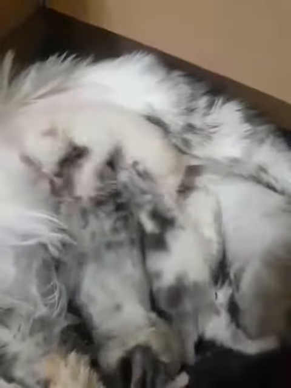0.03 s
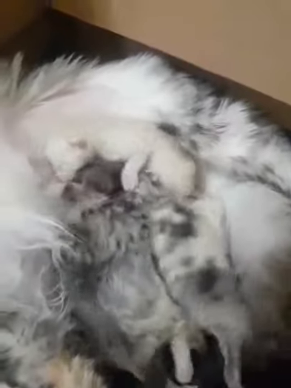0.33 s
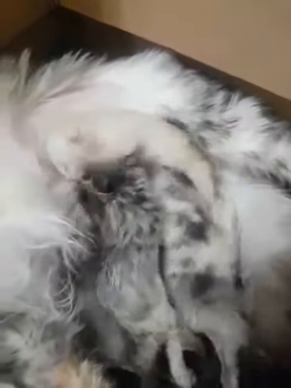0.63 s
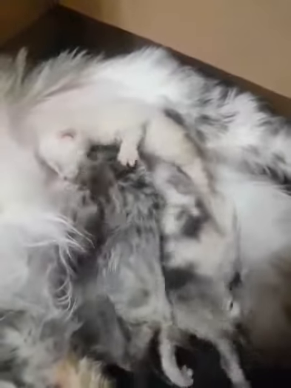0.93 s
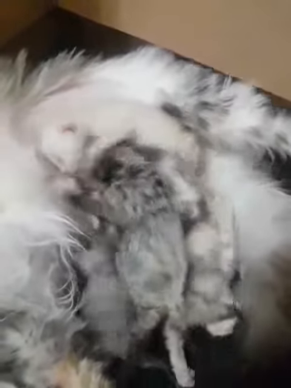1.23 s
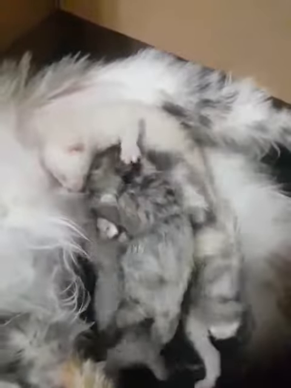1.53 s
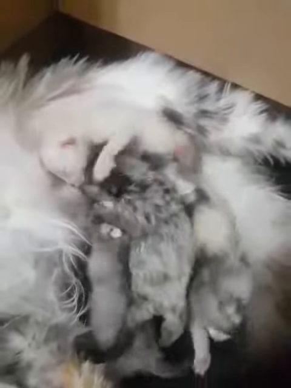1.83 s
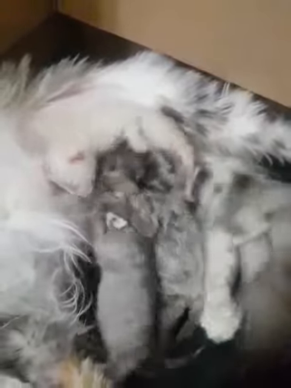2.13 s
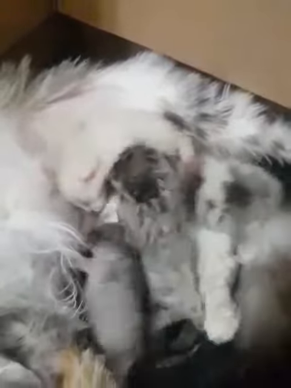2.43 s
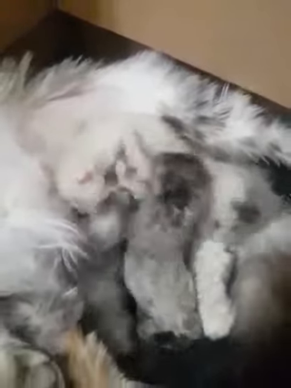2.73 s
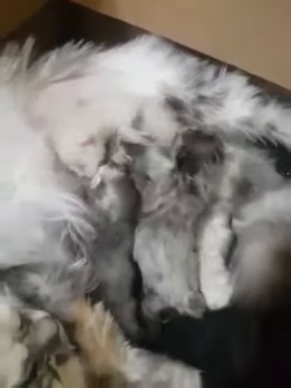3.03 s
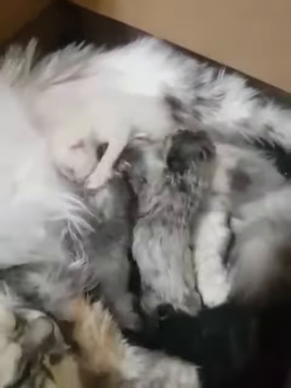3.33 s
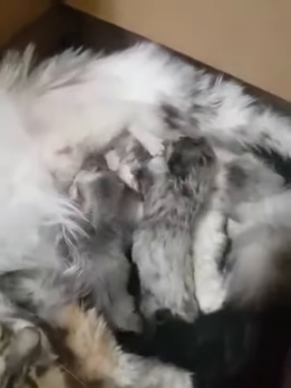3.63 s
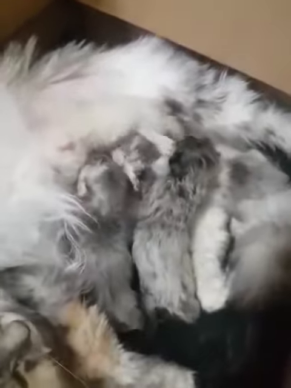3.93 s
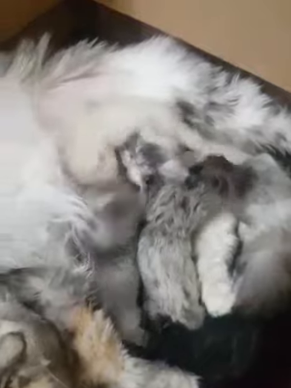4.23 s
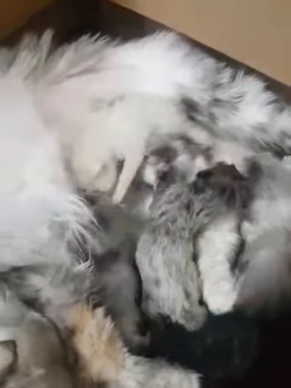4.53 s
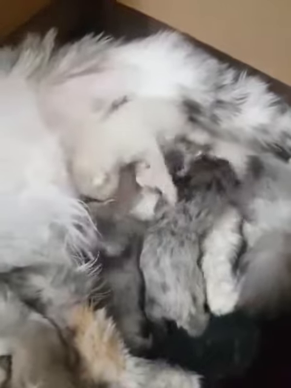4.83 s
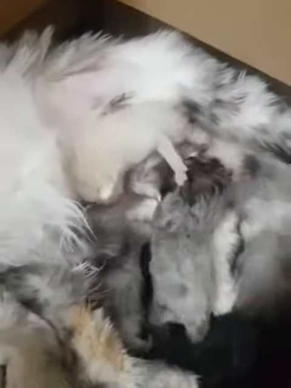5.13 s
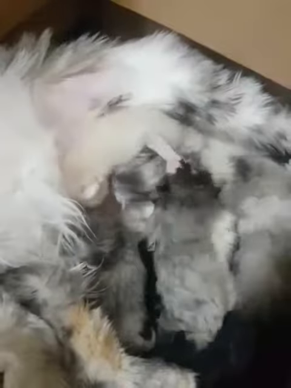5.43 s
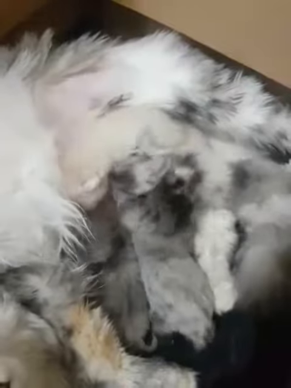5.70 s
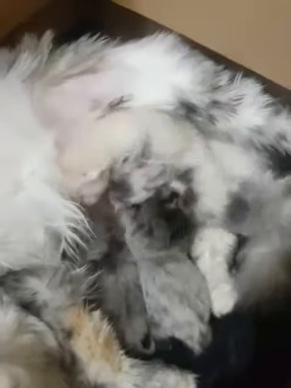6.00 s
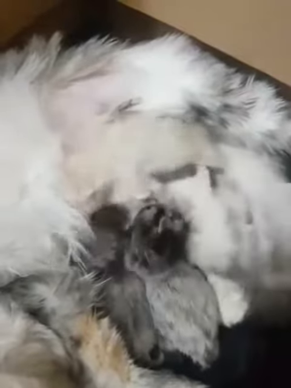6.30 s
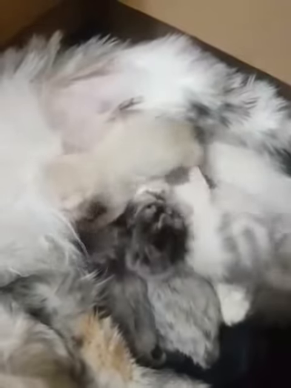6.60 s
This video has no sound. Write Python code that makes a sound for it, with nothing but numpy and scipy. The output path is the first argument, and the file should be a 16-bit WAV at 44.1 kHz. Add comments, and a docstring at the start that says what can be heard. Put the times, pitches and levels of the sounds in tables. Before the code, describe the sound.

Newborn kittens nurse in a cardboard box in a quiet room, heard close up with almost no echo. The mother's soft, low purr swells and eases throughout, over faint rumble and hiss. In the first second, fur rustles and paws tap lightly. From 1.1 to 1.7 seconds one kitten gives a high, thin cry, the loudest call, rising and then falling to a rough end. A small squeak follows at 2 seconds and a dull bump at 2.5. Faint, hoarse whimpers lead into another squeak at about 3.2 seconds, and a few taps come near 3.7. More breathy whimpers at 4.3 seconds run into a milder, fairly level mew from 4.6 to 5 seconds. After that only the purr, a faint rustle and tiny wet suckling clicks remain until the end, near 7 seconds. Everything sits slightly to the right.

```python
"""Newborn kittens nurse in a cardboard box in a quiet room. From the start fur rubs, paws tap,
small mouths click and the mother's voice box beats out a soft purr. After a second one kitten's
vocal folds buzz in a long cry that rises and falls. Short squeaks follow near 2 and 3 seconds,
with hoarse, breathy whimpers between the calls. A milder long mew ends at 5 seconds,
leaving the purr, a few faint clicks and a low rumble with hiss."""
import sys
import numpy as np
from scipy import signal
from scipy.fft import rfft, irfft, next_fast_len
from scipy.io import wavfile
from scipy.ndimage import map_coordinates

SR = 44100
rng = np.random.default_rng(int(sys.argv[2]) if len(sys.argv) > 2 else 0)


def wav_out(sig):
    """Save sig, one row per channel (or a flat mono array), as 16-bit PCM at SR to the path in sys.argv[1]."""
    wavfile.write(sys.argv[1], SR, np.round(np.clip(np.atleast_2d(sig).T, -1, 1) * 32767).astype(np.int16))


N = 298116

# The cry, two squeaks and the mild mew. Overtones and sharp top are set for an open mouth:
# level_db, swell_s, swell_db, mouth_opens_at_s, closing_share, overtones_db, sharp_db, hiss_ratio
CALLS = [(-42, 0.18, 17, 1.3505, 0.9, 16.5, -2.5, .4), (-53, 0.053, 7.5, 1.7, 0.6, 9.5, -27.5, 0.43),
         (-48.5, .07, 7.5, 3.09, 0, -6, -37.5, 0.45), (-46.5, 0.044, 7, 4.63, 0, -5, -15, 0.69)]
# How the pitch arches in each call (one list per squeak): time_s, pitch_hz
CRY_ARCH = [(1.13, 530), (1.151, 550), (1.18, 677), (1.215, 869), (1.291, 996), (1.324, 1009),
            (1.365, 1064), (1.43, 1075), (1.495, 1123), (1.53, 1115), (1.554, 1084), (1.59, 1044),
            (1.621, 940), (1.66, 883), (1.69, 764), (1.73, 485)]
SQUEAK_ARCHES = [
    [(1.928, 520), (1.95, 543), (1.975, 741), (2.0, 695.4), (2.025, 650), (2.046, 586)],
    [(3.12, 699), (3.135, 681), (3.205, 874), (3.24, 859), (3.281, 807)],
]
MEW_ARCH = [(4.576, 650), (4.6, 788), (4.625, 896), (4.66, 909), (4.7, 877), (4.75, 867), (4.78, 887),
            (4.82, 894), (4.86, 885), (4.9, 884), (4.93, 813), (4.955, 715), (4.97, 816), (4.984, 780)]
# How the mouth shapes the first three harmonics (multiples of the pitch): frequency_hz, gain_db
CRY_MOUTH = [(520, -1), (750, -1.5), (930, -2), (1080, 4.5), (1300, -0.5), (1520, 5), (1750, 5.5),
             (1880, -1.5), (2030, 12.5), (2170, 6), (2260, 8.5), (2600, 13.5), (2850, 10.5), (3300, -0.5)]
SQUEAK_MOUTH = [(550, 3.5), (850, -3), (1150, 4.5), (1400, 4), (1750, -2), (2100, 2), (2600, -9.5)]
MEW_MOUTH = [(700, -4), (890, -0.5), (1450, -0.5), (1780, -1), (2150, 0.5), (2450, 3), (2720, 1)]
# How the throat shapes the higher harmonics: frequency_hz, gain_db
CRY_THROAT = [(2600, 10), (3400, -10.5), (4350, 0.5), (4900, -10), (5600, -21.5), (6500, -26),
              (7500, -14.5), (8600, -34), (10000, -39.5), (11500, -34.5), (13000, -29)]
SQUEAK_THROAT = [(2600, 5.5), (3300, -7), (3900, 2.5), (4350, 3), (5000, -13), (5600, -31), (7500, -25),
                 (12500, -27)]
MEW_THROAT = [(2600, 16), (3500, 10.5), (4400, 7.5), (5300, -2.5), (6300, -2.5), (7300, -17), (8300, -24.5),
              (10000, -28.5), (12000, -17), (13200, -35.5)]
# The voice cracks for a moment: middle_s, half_length_s, roughness_share
VOICE_CRACKS = [(1.438, .014, 0.09), (1.582, 0.027, 0.12), (2.021, .03, 0.14), (3.141, 0.043, .25),
                (3.271, 0.029, 0.42), (4.587, .03, .3), (4.774, 0.057, 0.24), (4.974, 0.025, 0.3)]
# The voice catches, so the lowest harmonic jumps and the others dip: middle_s, jump_db
VOICE_CATCHES = [(1.719, 10.5), (2.038, 11.5), (3.274, 11.5), (4.795, 13.5), (4.968, 11)]
# Whimpers, alone or joined to a call: start_s, length_s, level_db, change_db, start_hz, end_hz
HOARSE_WHIMPERS = [(.1, .11, -59.5, 0.5, 702, 616), (1.125, .115, -65, 11, 539.4, 900),
                   (2.033, 0.036, -57, -8, 600, 566), (2.637, 0.077, -64, 2.5, 630, 524),
                   (2.794, .095, -58, -2.5, 751, 986), (2.881, 0.11, -60, -2.5, 985, 888),
                   (3.005, 0.12, -62, 0, 862.6, 715), (3.269, 0.039, -59.5, -0.5, 818, 782),
                   (4.275, .11, -54.5, -1, 545, 691), (4.36, .075, -57, -4.5, 688, 643),
                   (4.415, .15, -63, 6.5, 630, 807)]
# The tone colour of a hoarse voice: frequency_hz, gain_db
HOARSE_COLOUR = [(300, -37), (480, -1), (650, 2.5), (1200, 3), (2300, -1), (2650, -0.5), (3000, -37.5),
                 (3600, -14), (4400, 2), (5000, -16), (5600, -21.5), (8000, -27), (13000, -49)]
# How the voice arrives from two spots in the box: frequency_hz, left_minus_right_db, left_lead_radians
CRY_SPOT = [(650, -1.5, 0.29), (920, -17, 0.23), (1074, -9, 3.4), (1500, 0.5, 2), (2000, 3.5, 2),
            (2200, -5.5, 0.46), (3000, -8.5, 4.4), (3570, -8.5, 6.1), (4060, -10.5, 6.6),
            (4600, -11.5, 8.8), (5460, -6.5, 10.5), (7500, -14, 23), (9000, 7, 25.5), (12600, 0.5, 33.5)]
SMALL_CALL_SPOT = [(650, -1, -2), (900, -12.5, -0.96), (1350, -6.5, 3.5), (1760, -6.5, 1), (2690, -5.5, 2),
                   (3260, -6, 2.5), (4270, -6, 1.73), (5760, -3, -3), (12100, 5, 2)]
# The purr swells with the mother's slow breathing: middle_s, length_s, level_db
PURR_BREATHS = [(0.007, 0.18, -55.5), (0.595, 1, -61), (1.6, 1.2, -61), (2.777, 0.62, -57.5),
                (4.08, 0.77, -63), (5.027, 0.43, -59.5), (5.6, .3, -66), (6.566, 0.93, -62.5)]
# Where her chest rings: centre_hz, width_hz, gain_db
CHEST_RINGS = [(132.8, 104.2, 3), (189, 130, -2.5)]
# Fur rubs on fur and cardboard: middle_s, half_length_s, level_db
FUR_STROKES = [(.02, 0.024, -54), (.047, 0.057, -51.5), (.135, 0.14, -56), (0.177, .04, -56),
               (.246, 0.076, -51.5), (0.427, 0.15, -64), (.58, .14, -63.5), (0.834, 0.034, -58.5),
               (0.898, .08, -64.5), (1.39, 0.058, -49.5), (2.376, 0.038, -59.5), (2.84, 0.048, -59.5),
               (3.766, 0.035, -64.5), (4.052, 0.023, -62.5), (6.1, 0.064, -74)]
# The tone colour of rubbing fur: frequency_hz, gain_db
FUR_COLOUR = [(88, -35.5), (150, 0.5), (354, -4.5), (443, -8), (575, -2), (1070, -7), (2130, -11.5),
              (3330, -21.5), (4400, -18.5), (6050, -29), (13000, -39.5)]
# Dull taps and bumps, two strong low purr thumps and sharp wet clicks: start_s, peak_db, centre_hz
TAPS_AND_CLICKS = [(.036, -38, 900), (0.302, -56, 900), (0.5, -53, 705), (0.616, -47.5, 2500),
                   (.817, -39.5, 510), (.822, -41, 670), (1.315, -52.5, 7500), (1.43, -30.5, 701),
                   (1.5, -43, 496), (2.112, -47, 900), (2.144, -62, 1810), (2.177, -52.5, 900),
                   (2.36, -46.5, 755), (2.416, -57, 810), (2.51, -28, 327), (2.639, -48, 1000),
                   (2.793, -48, 198), (2.911, -43.5, 189), (3.056, -50, 980), (3.721, -43, 214),
                   (3.749, -47, 2000), (3.765, -39, 804), (3.896, -59, 2200), (5.589, -77, 900),
                   (6.04, -54, 1700)]
# How long the room's echo takes to fade by 60 dB: frequency_hz, fade_s
ECHO_FADES = [(200, 0.31), (2000, 0.38), (10000, 0.06)]
# The tone colour of the background rumble and hiss: frequency_hz, gain_db
BACKGROUND_COLOUR = [(20, -14), (35, -21.5), (55, -7), (100, -9.5), (230, -17.5), (440, -19.5),
                     (700, -21.5), (1100, -28.5), (2260, -23.5), (4400, -33), (7300, -37.5), (9000, -44),
                     (12200, -38), (13200, -42)]
# How alike that background is left and right (1 the same, -1 opposite): frequency_hz, likeness
BACKGROUND_LIKENESS = [(60, 0.86), (180, 0.4), (510, -0.37), (1510, -0.66), (4410, -0.38), (12900, -0.078)]

TOP_HZ = 13250  # upper limit of the sound
RELEASE_S, RELEASE_DB = 0.015, 11.5  # the quick drop that ends a call
SOFT_START_DB = -5.5  # harmonics two and three, until the call has swelled
SAG_DB_PER_OCTAVE, ROUGH_PER_OCTAVE = 6.5, 0.837  # a sinking pitch gets softer and rougher
CLEAN_OCTAVES, RATTLE_DB = 0.12, 13.5  # sag before the folds rattle; overtones gained at full rattle
OPEN_S = 0.036  # time to open the mouth
SHUT_THIRD_DB, SHUT_OVERTONES_DB, SHUT_SHARP_DB = -11, -9.5, -31.5  # a shut mouth dulls the voice
CATCH_HALF_S, CATCH_DIP = 0.01, 0.62  # the dip is in dB per dB of jump
FLUTTER_LOW_DB, FLUTTER_HIGH_DB = 0.47, 4.5  # unsteady level of the low and high harmonics


def mew(arch, call, mouth_colour, throat_colour):
    """Vocal folds buzz through throat and mouth; when they rattle, the tone frays into noise."""
    base_db, swell_s, swell_db, opens_s, closing, open_overtones_db, open_sharp_db, hiss_ratio = call
    t, window = span(arch)
    hz, = curves(arch, t)
    sag_octaves = np.log2(hz.max() / hz)
    cracks = sum(depth * (1 - ramp(np.abs(t - s), half)) for s, half, depth in VOICE_CRACKS)
    rough = np.clip(ROUGH_PER_OCTAVE * np.maximum(sag_octaves - CLEAN_OCTAVES, 0) + cracks, 0, 1)

    # The call swells, holds and is cut short.
    swell = ramp(t - t[0], swell_s)
    release = 1 - ramp(t[-1] - t, RELEASE_S)
    catch_db = sum(db * (1 - ramp(np.abs(t - s), CATCH_HALF_S)) for s, db in VOICE_CATCHES)
    level_db = base_db - swell_db * (1 - swell) - RELEASE_DB * release
    level_db -= SAG_DB_PER_OCTAVE * sag_octaves + CATCH_DIP * catch_db

    # Three layers: low harmonics, overtones and a sharp top. Opening the mouth brightens them.
    opened = ramp(t - opens_s, OPEN_S) * (1 - closing * ramp(t - opens_s, t[-1] - opens_s) ** 2)
    shut = 1 - opened
    overtone_db = level_db + opened * open_overtones_db + shut * SHUT_OVERTONES_DB + RATTLE_DB * rough
    sharp_db = level_db + opened * open_sharp_db + shut * SHUT_SHARP_DB
    harmonic = np.arange(1, 21)[:, None]
    low_db = level_db + along(mouth_colour, harmonic[:3] * hz)
    low_db[0] += (1 + CATCH_DIP) * catch_db
    low_db[1:] += SOFT_START_DB * (1 - swell ** 3)
    low_db[2] += SHUT_THIRD_DB * shut * (1 - rough)

    hz = hz * (1 + 0.002 * wobble(t, 80.5) + 0.057 * rough * wobble(t, 450))  # the pitch trembles
    phase = 2 * np.pi * np.cumsum(hz) / SR
    harmonic_hz = harmonic * hz
    throat = amp(along(throat_colour, harmonic_hz)) * (harmonic > 3) * (harmonic_hz < TOP_HZ)
    top = ramp(harmonic_hz - 5800, 900)
    gain = share_power(throat * (1 - top)) * amp(overtone_db - 2)
    gain += share_power(throat * top) * amp(sharp_db - 1)
    gain[:3] = amp(low_db)

    # High harmonics flutter and fray more than low ones.
    depth_db = FLUTTER_LOW_DB + (FLUTTER_HIGH_DB - FLUTTER_LOW_DB) * ramp(harmonic - 1, 5.2) ** 2
    flutter = amp(depth_db * np.array([wobble(t, 55.6) for _ in harmonic]))
    hiss = hiss_ratio * (harmonic_hz / TOP_HZ) ** 3.7
    fray = np.array([wobble(t, 700) + 1j * wobble(t, 700) for _ in harmonic])
    fray *= 0.2 * rough * harmonic + hiss
    waves = np.imag((1 + fray) * np.exp(1j * harmonic * phase))
    tone = np.sqrt(2) * np.sum(gain / np.hypot(1, hiss) * flutter * waves, axis=0)
    breath = noise(HOARSE_COLOUR, len(t)) * (1 + 0.57 * np.cos(phase)) * np.linalg.norm(gain, axis=0)
    return window * (tone + amp(-6) * rough * breath)


def whimper(length_s, start_db, change_db, start_hz, end_hz, fade_s=0.013, bright_above_db=-60):
    """Folds that barely close give a shaky tone in pulsing hiss, brighter when pressed harder."""
    t = np.arange(int(length_s * SR)) / SR
    progress = t / length_s
    window = ramp(np.minimum(t, length_s - t), fade_s)
    level_db = start_db + change_db * progress
    glide_hz = start_hz + (end_hz - start_hz) * progress
    arch = 0.036 * np.sin(np.pi * progress)
    tremble = 0.02 * wobble(t, 55) + 0.018 * wobble(t, 377.8)
    hz = glide_hz * (1 + arch + tremble)
    phase = 2 * np.pi * np.cumsum(hz) / SR
    tone = sum(amp(along(HOARSE_COLOUR, k * hz)) * k ** -0.3 * np.sin(k * phase) for k in range(1, 10))
    breath = noise(HOARSE_COLOUR, len(t)) * (1 + 0.47 * np.cos(phase))
    rasp = (amp(-1) * unit(tone) + amp(-1.5) * unit(breath)) * amp(0.58 * wobble(t, 229.6))
    treble = filtered(rasp, lambda f: ramp(f - 2800, 600))
    treble_gain = amp(np.minimum(3.1 * (level_db - bright_above_db), 2))
    return window * amp(level_db) * (rasp + (treble_gain - 1) * treble)


def kitten():
    """The full cry comes from one spot in the box, the smaller calls from another."""
    cry, small_calls = np.zeros(N), np.zeros(N)
    first, *squeaks, last = CALLS
    add(cry, CRY_ARCH[0][0], mew(CRY_ARCH, first, CRY_MOUTH, CRY_THROAT))
    for arch, call in zip(SQUEAK_ARCHES, squeaks):
        add(small_calls, arch[0][0], mew(arch, call, SQUEAK_MOUTH, SQUEAK_THROAT))
    add(small_calls, MEW_ARCH[0][0], mew(MEW_ARCH, last, MEW_MOUTH, MEW_THROAT))
    for start_s, *shape in HOARSE_WHIMPERS:
        add(small_calls, start_s, whimper(*shape))
    return box_colour(cry, CRY_SPOT) + box_colour(small_calls, SMALL_CALL_SPOT)


def box_colour(voice, spot):
    """The box gives each frequency a different level and timing on the left and the right."""
    spot = np.array(spot)

    def response(hz):
        left_gain = amp(along(spot[:, [0, 1]], hz))
        left_lead = np.exp(1j * along(spot[:, [0, 2]], hz))
        keep_power = np.sqrt(2 / (1 + left_gain ** 2))
        return np.array([left_gain * left_lead, np.ones_like(hz)]) * keep_power
    return filtered(voice, response)


def purr(beats_per_s=27.5, rest_db=-75):
    """Uneven beats of the mother's voice box thump through her chest."""
    t = np.arange(N) / SR
    cycles = np.cumsum(beats_per_s * (1 + 0.047 * wobble(t, 4.2))) / SR
    beats = np.diff(np.floor(cycles), prepend=0) * amp(3.2 * wobble(t, 30))
    puffs = rng.standard_normal(N) * np.exp(-(cycles % 1) / 0.65)
    chest = lambda f: sum(amp(db) * resonance(f, hz, width) ** 2 for hz, width, db in CHEST_RINGS)
    body = amp(-5.5) * unit(filtered(beats, chest)) + amp(-6) * unit(filtered(puffs, chest))
    swells = sum(amp(db) * np.cos(np.pi / 2 * ramp(np.abs(t - middle_s), length_s / 2))
                 for middle_s, length_s, db in PURR_BREATHS)
    return body * np.hypot(swells, amp(rest_db))


def taps_and_clicks(damping=0.67, rustle_fade_s=0.032):
    """Dull taps, low thumps and sharp wet clicks: each a fast-dying pulse with a short rustle."""
    track, t = np.zeros(N), np.arange(SR // 10) / SR
    for start_s, peak_db, centre_hz in TAPS_AND_CLICKS:
        treble_cut = lambda f: 1 / (1 + 1j * f / (4 * centre_hz)) ** 2
        pulse_colour = lambda f: resonance(f, centre_hz, damping * centre_hz) * treble_cut(f)
        pulse = filtered(1.0 * (t == 0), pulse_colour)
        rustle_db = -39 + 0.3 * peak_db - 60 * t / rustle_fade_s  # louder pulses rustle a little more
        rustle = unit(filtered(noise(FUR_COLOUR, len(t)), treble_cut)) * amp(rustle_db)
        add(track, start_s, rustle - amp(peak_db) * pulse / np.abs(pulse).max())
    return track


def fur_rubbing():
    """Squirming bodies rub in grainy swells over a faint, constant rustle."""
    track = np.zeros(N)
    for middle_s, half_s, level_db in FUR_STROKES:
        t = np.arange(int(2 * half_s * SR)) / SR
        grains = unit(noise(FUR_COLOUR, len(t)) * amp(3 * wobble(t, 220)))
        add(track, middle_s - half_s, amp(level_db) * grains * np.hanning(len(t)) ** 2)
    rustle = noise(FUR_COLOUR, N) * amp(0.67 * wobble(np.arange(N) / SR, 17))
    return track + amp(-73) * rustle


def suckling(ticks_per_s=6, softest_db=-68, fade_s=0.0037):
    """Nursing mouths make tiny wet ticks at random moments."""
    track, t = np.zeros(N), np.arange(SR // 40) / SR
    for when, size, brightness in rng.random((int(ticks_per_s * N / SR), 3)):
        hz = 6000 * 2 ** (1.3 * brightness - 0.75)
        burst = rng.standard_normal(len(t)) * amp(-60 * t / fade_s)
        tick = filtered(burst, lambda f: resonance(f, hz, hz))
        add(track, when * N / SR, amp(softest_db + 8 * size ** 2) * tick / np.abs(tick).max())
    return track


def room_echo(sound):
    """The room answers with a short echo whose treble dies first."""
    hz, t, bands = signal.stft(rng.standard_normal((2, SR // 3)), SR, nperseg=256)
    fade = amp(-60 * t / along(ECHO_FADES, hz)[:, None])
    tail = signal.istft(bands * fade, SR, nperseg=256)[1]
    return signal.fftconvolve(sound, tail / np.linalg.norm(tail[0]), axes=1)[:, :N]


def background():
    """Low room rumble lies under microphone hiss."""
    angle = lambda hz: np.arccos(np.clip(along(BACKGROUND_LIKENESS, hz), -1, 1)) / 2
    pair = np.array([noise(BACKGROUND_COLOUR, N), noise(BACKGROUND_COLOUR, N)])
    shared, opposite = filtered(pair, lambda hz: np.array([np.cos(angle(hz)), np.sin(angle(hz))]))
    return amp(-65.5) * np.array([shared + opposite, shared - opposite])


def amp(db):
    """Turn decibels into a gain."""
    return 10 ** (np.asarray(db) / 20)


def unit(x):
    """Scale a sound to an average power of 1."""
    return x / np.sqrt(np.mean(x ** 2) + 1e-20)


def share_power(gains):
    """Scale harmonics so that their powers add up to 1."""
    return gains / np.sqrt(np.sum(gains ** 2, axis=0) + 1e-12)


def ramp(t, length):
    """Rise from 0 to 1 as t goes from 0 to length."""
    return np.clip(t / length, 0, 1)


def along(points, hz):
    """Read a (frequency_hz, value) table at hz, with octaves evenly spaced."""
    frequencies, values = np.transpose(points)
    return np.interp(np.log(hz + 1), np.log(frequencies + 1), values)


def curves(rows, t):
    """Read each column after the first at the times t."""
    times, *columns = np.transpose(rows)
    return [np.interp(t, times, column) for column in columns]


def span(rows, fade_s=0.0081):
    """The sample times that a table covers, and a window with soft ends."""
    t = np.arange(round(rows[0][0] * SR), round(rows[-1][0] * SR)) / SR
    return t, ramp(np.minimum(t - t[0], t[-1] - t), fade_s)


def wobble(t, points_per_s):
    """A smooth curve through random points."""
    position = (t - t[0]) * points_per_s
    return map_coordinates(rng.standard_normal(int(position[-1]) + 4), [position])


def filtered(x, response):
    """Scale and shift each frequency of x by response(hz)."""
    n = x.shape[-1]
    padded = next_fast_len(n + 8192)
    return irfft(rfft(x, padded) * response(np.fft.rfftfreq(padded, 1 / SR)), padded)[..., :n]


def noise(colour, n):
    """Noise with the given tone colour and a power of 1."""
    return unit(filtered(rng.standard_normal(n), lambda hz: amp(along(colour, hz))))


def resonance(hz, centre_hz, width_hz):
    """A filter that rings around one frequency."""
    return 1j * hz * width_hz / (centre_hz ** 2 - hz ** 2 + 1j * hz * width_hz)


def add(track, start_s, sound):
    """Mix a sound into the track."""
    start = max(round(start_s * SR), 0)
    track[start:start + len(sound)] += sound[:max(N - start, 0)]


def panned(x, right_db):
    """Make a sound louder on the right than on the left."""
    return x * amp([[-right_db / 2], [right_db / 2]])


def scene():
    """The kittens lie a little to the right, so close that the room barely answers."""
    voice = kitten()
    noises = panned(fur_rubbing(), right_db=6.5) + panned(taps_and_clicks() + suckling(), right_db=7.5)
    echo = amp(-23) * room_echo(voice) + amp(-15.5) * room_echo(noises)
    return voice + noises + echo + panned(purr(), right_db=3) + panned(background(), right_db=1.5)


def record(dry):
    """Cut away the very highest treble."""
    return filtered(dry, lambda hz: hz < TOP_HZ)


dry = scene()
out = record(dry)
wav_out(out)
```